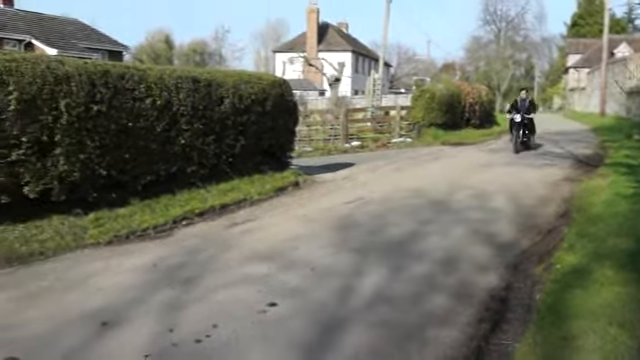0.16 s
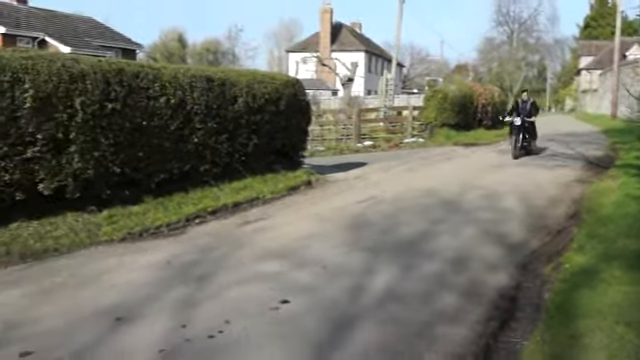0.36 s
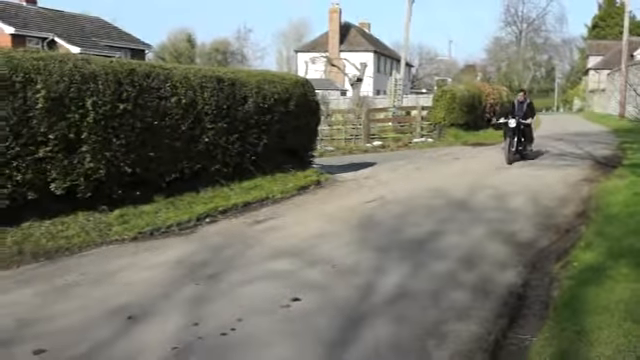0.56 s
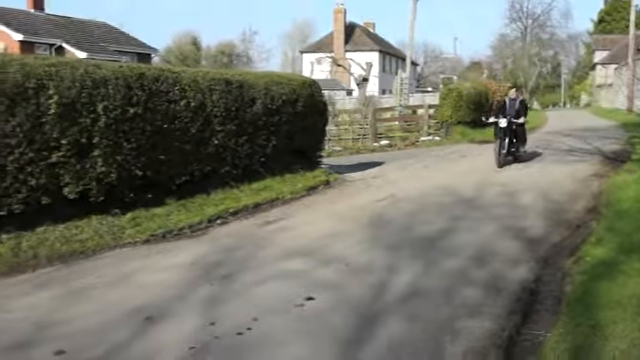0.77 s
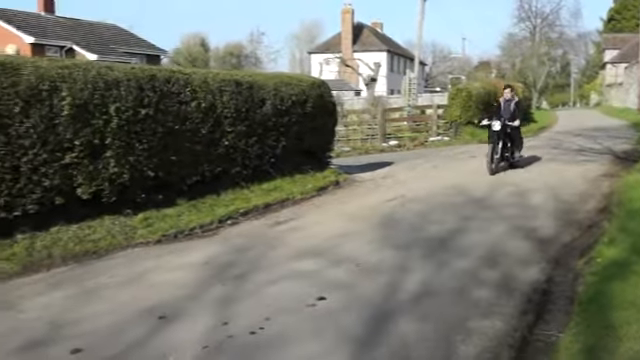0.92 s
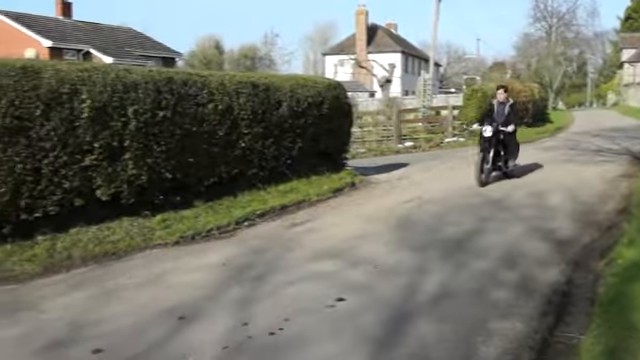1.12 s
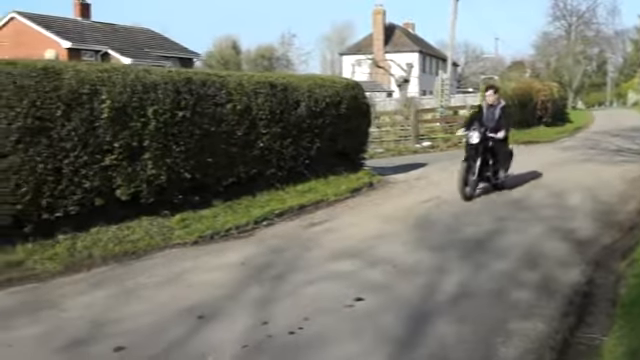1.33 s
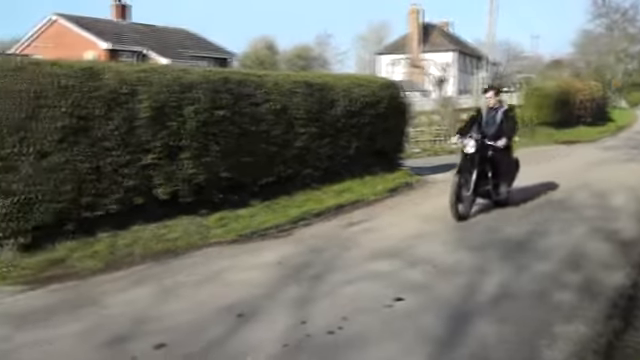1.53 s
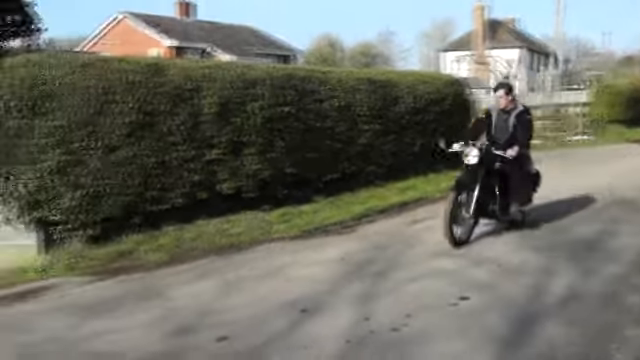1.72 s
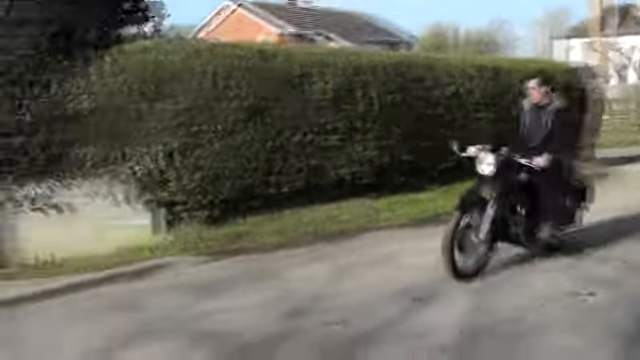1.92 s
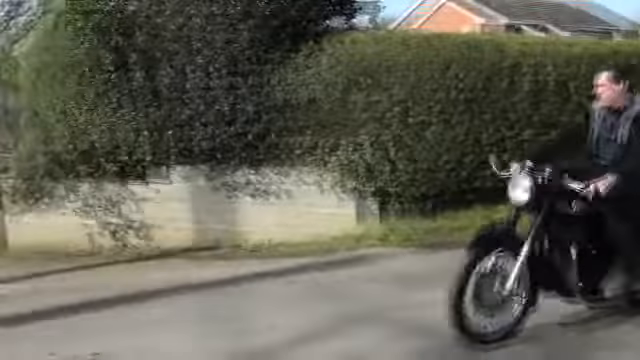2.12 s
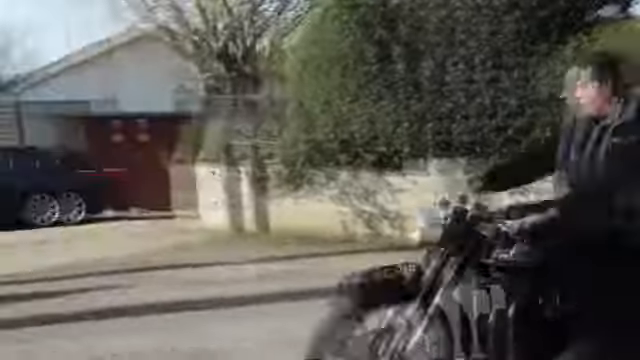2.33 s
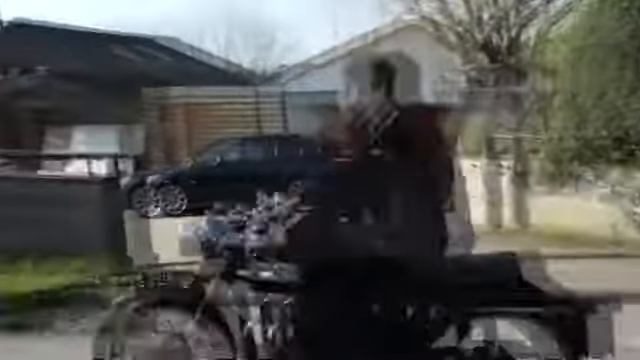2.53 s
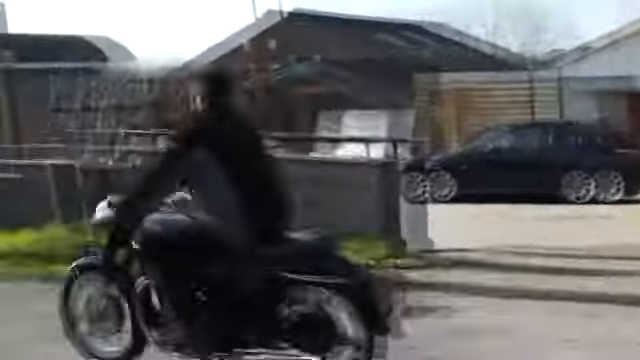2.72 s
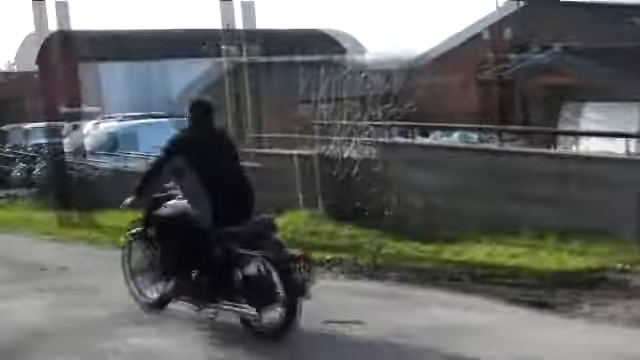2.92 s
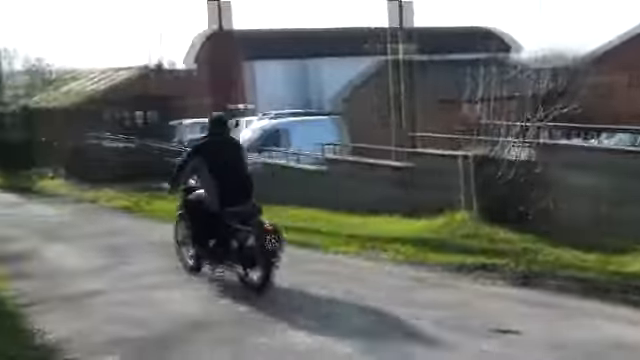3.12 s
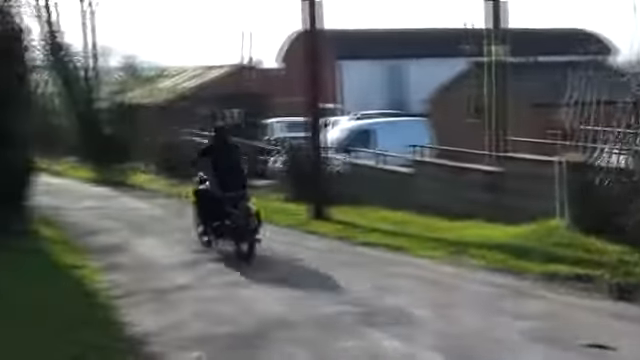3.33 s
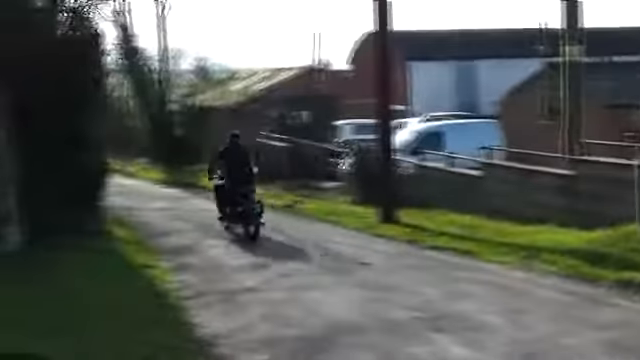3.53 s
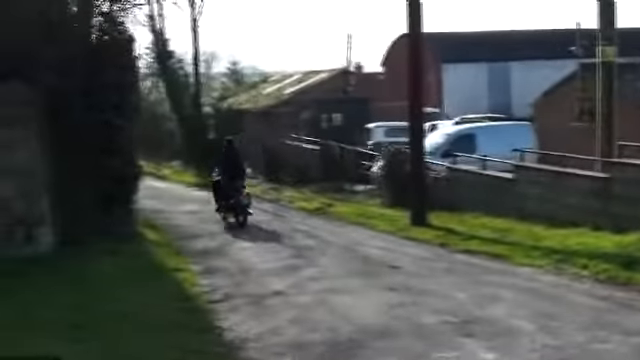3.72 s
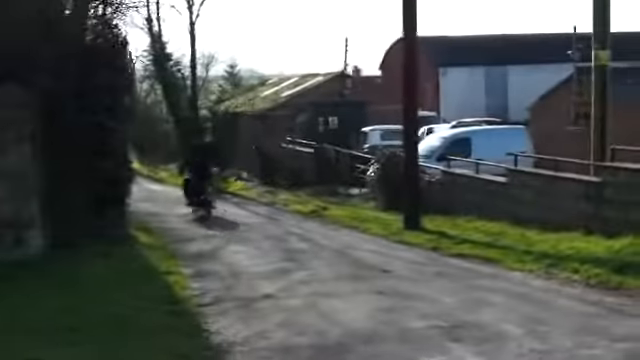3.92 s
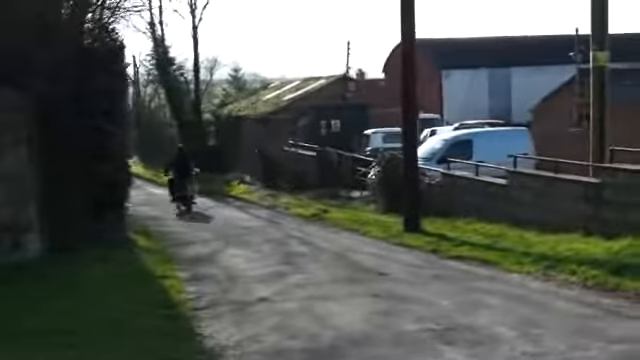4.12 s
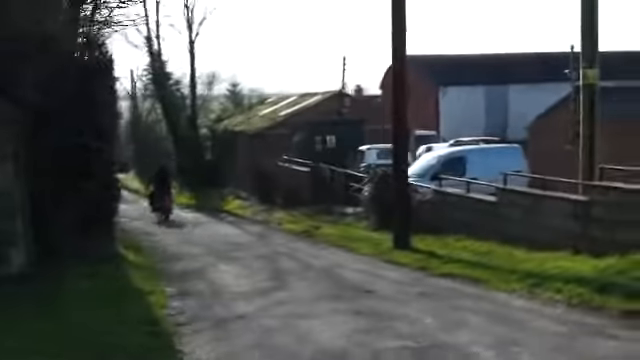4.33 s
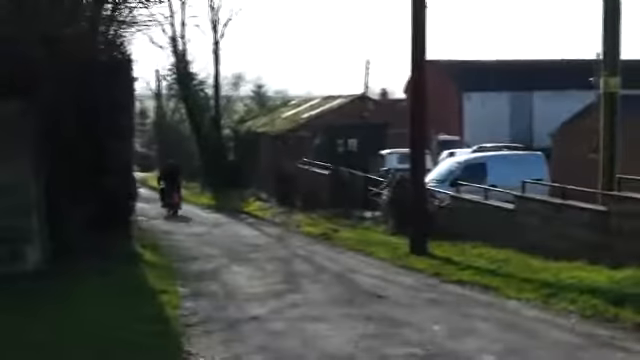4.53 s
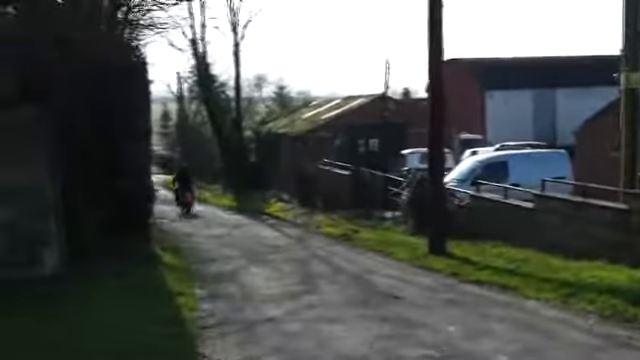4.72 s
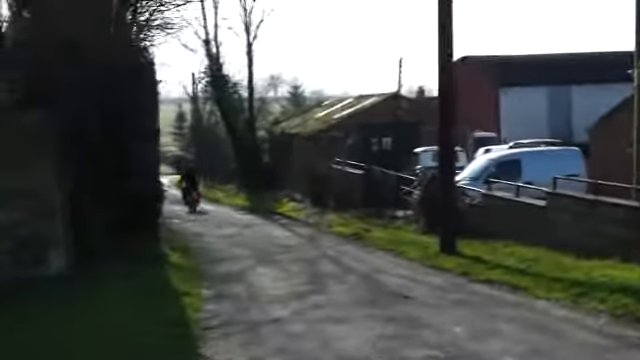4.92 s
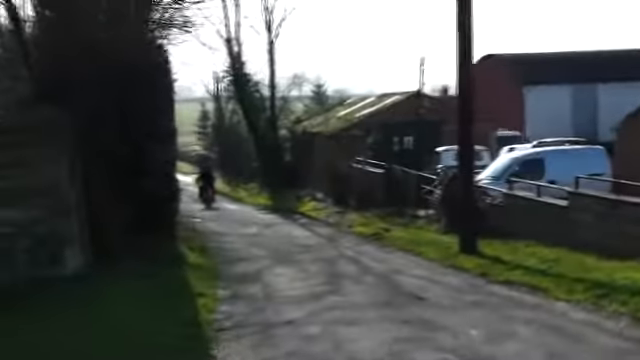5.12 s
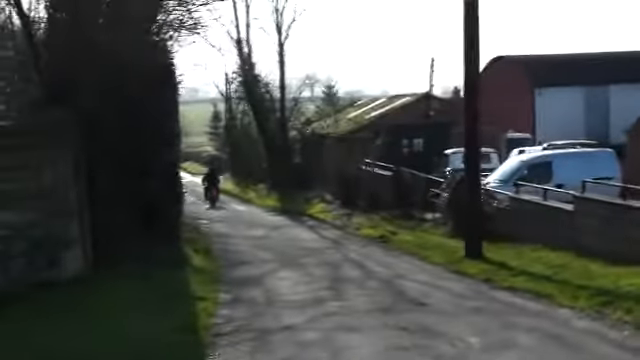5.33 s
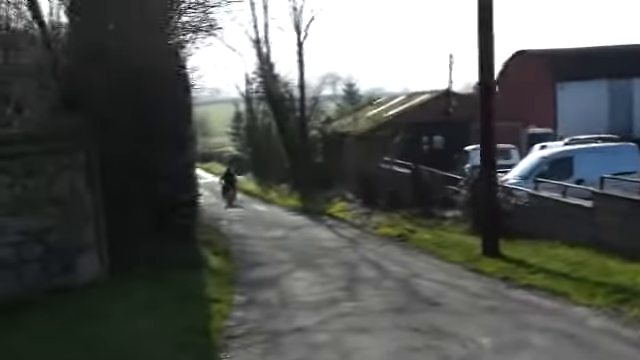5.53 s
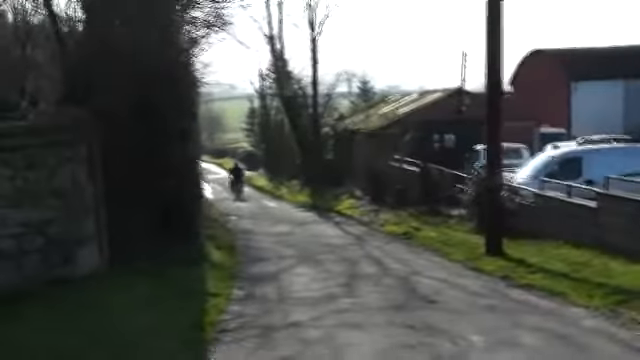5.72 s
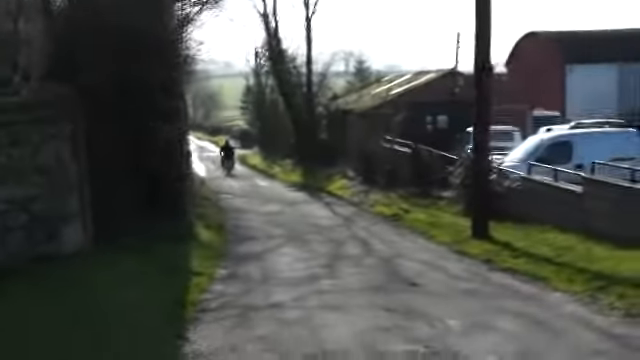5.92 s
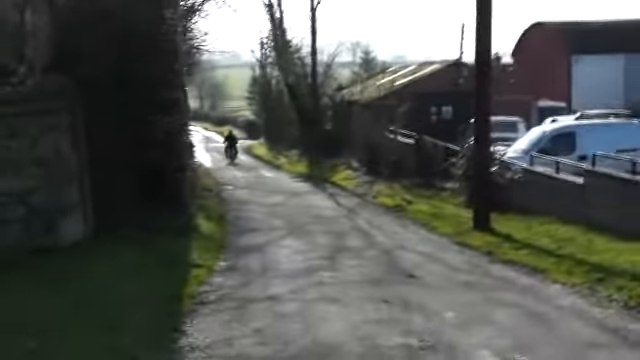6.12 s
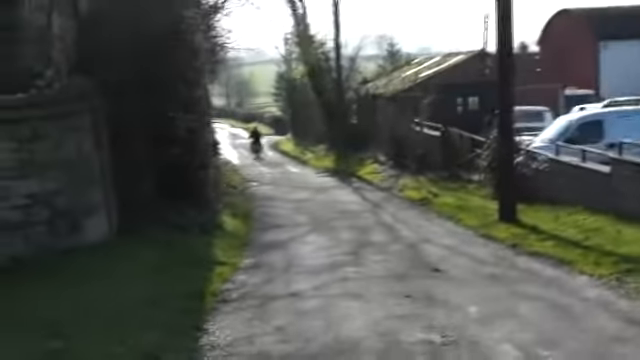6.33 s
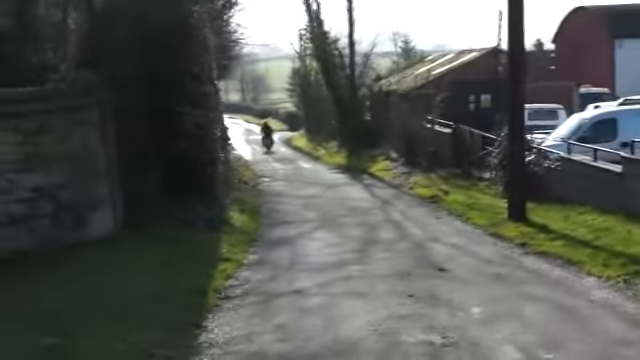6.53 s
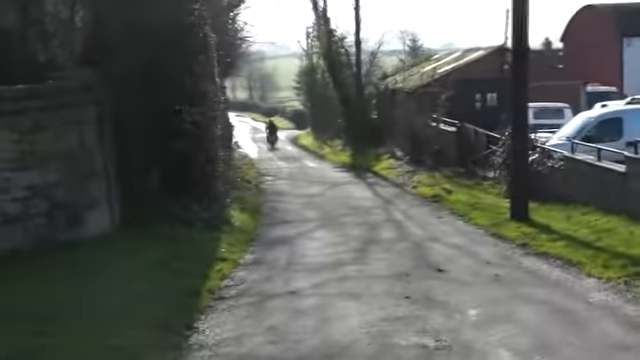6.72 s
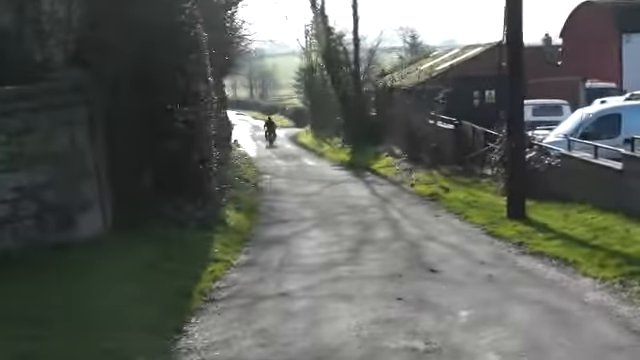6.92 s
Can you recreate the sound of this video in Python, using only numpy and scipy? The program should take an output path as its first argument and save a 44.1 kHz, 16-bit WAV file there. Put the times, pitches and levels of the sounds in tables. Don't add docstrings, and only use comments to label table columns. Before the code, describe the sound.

Wind rumbles on a hand-held microphone as a throaty old motorcycle accelerates past, pitch dropping, then dwindles to quiet with faint handling creaks.

```python
import sys
import numpy as np
from scipy import signal
from scipy.io import wavfile

SR = 44100
rng = np.random.default_rng(int(sys.argv[2]) if len(sys.argv) > 2 else 0)


def file_out(sig):
    cols = np.atleast_2d(sig).T
    lim = np.clip(cols, -1, 1)
    pcm = np.round(lim * 32767).astype(np.int16)
    wavfile.write(sys.argv[1], SR, pcm)


def how_loud(loudness_db):
    steps = np.asarray(loudness_db, float) / 20
    return 10 ** steps


N = 311346
T = np.arange(N) / SR
PASS_S = 2.5
NEAR_DB = -35
TAIL_ON_S = 3.83
FAR, PULL, SHUT, DRIVE, OVERRUN = range(5)

# time_s, cycles_per_s
REVS = [(0, 16.61), (0.9, 19.02), (1.4, 20.8), (1.9, 23.34), (2.25, 25.89), (2.47, 28.06), (2.54, 25.3),
        (2.75, 19.28), (2.92, 16.66), (3.02, 20.95), (3.2, 20.35), (3.45, 19.03), (3.6, 19.76),
        (3.9, 18.78), (4.6, 17.05), (5.9, 13.79), (6.15, 15.47), (7.1, 15.13)]
# time_s, effort_db, nearness_db
RIDE = [(0, -51, -58.5), (.5, -46, -49), (1.2, -31, -45.5), (1.6, -38.5, -39), (2.02, -25, -30),
        (2.36, -23.5, -29), (2.55, -24, -33.5), (2.88, -23.5, -36.5), (2.97, -20.5, -35.5),
        (3.2, -24.5, -38.5), (3.5, -18.5, -36.5), (3.585, -22.5, -39), (3.66, -40, -51), (3.81, -30, -47),
        (3.86, -28, -48.5), (4.3, -35, -57), (4.95, -53.5, -63.5), (6.4, -68, -72.5), (7.1, -45, -65)]


def rms_one(x):
    return x / np.sqrt(np.mean(x ** 2) + 1e-20)


def filtered(x, order, cut_hz, kind="low"):
    return signal.sosfilt(signal.butter(order, cut_hz, kind, fs=SR, output="sos"), x)


def in_time(rows, at=T):
    s, *columns = np.transpose(rows)
    return [np.interp(at, s, c) for c in columns]


def at_hz(points, hz):
    return np.interp(np.log(hz), np.log(np.array(points)[:, 0]), np.array(points)[:, 1])


def drift(rate):
    r = np.exp(-80 * np.pi * rate / SR)
    slow = signal.lfilter([1], [1, -2 * r, r * r], rng.standard_normal(N // 40 + 2002))[2000:]
    return np.interp(np.arange(N) / 40, np.arange(len(slow)), rms_one(slow))


def ring(clicks, modes):
    out = 0
    for hz, level_db, t60 in modes:
        r, w = how_loud(-60 / (t60 * SR)), 2 * np.pi * hz / SR
        out = out + signal.lfilter([0, how_loud(level_db) * np.sin(w)], [1, -2 * r * np.cos(w), r * r], clicks + 1e-18)
    return out


def swell(clicks, mode):
    return ring(ring(clicks, [mode]), [mode]) * 2 * np.e * np.log(1000) / (mode[2] * SR)


def burst(clicks, t60, low_hz, high_hz, rise=0):
    soft = np.exp(-1 / (rise * SR + 1e-9))
    decay = how_loud(-60 / (t60 * SR))
    envelope = signal.lfilter([1 - soft], np.convolve([1, -soft], [1, -decay]), np.abs(clicks) + 1e-18)
    return filtered(envelope * rng.standard_normal(N), 2, [low_hz, high_hz], "band")


def clicks_at(seconds, sizes):
    return np.bincount(np.clip(np.round(seconds * SR).astype(int), 0, N - 1), sizes, N)


def banded_noise(spectrum, likeness, patchy_db, rate):
    edges = np.geomspace(spectrum[0][0], spectrum[-1][0], 17)
    out, together, white = 0, drift(rate), rng.standard_normal((2, 2, N))
    for k, (low, high) in enumerate(zip(edges, edges[1:])):
        mid, side = filtered(white[k % 2], 2, [low, high], "band")
        hz = np.sqrt(low * high)
        alike = np.clip(at_hz(likeness, hz), -1, 1)
        gain = how_loud(at_hz(spectrum, hz) + patchy_db * (together + 1.12 * drift(rate)))
        out = out + gain * (np.sqrt(1 + alike) * mid + np.sqrt(1 - alike) * side * [[1], [-1]])
    return rms_one(out)


def lane_floor():
    # freq_hz, level_db_per_hz
    lane = [(40, -2), (70, 14.5), (110, 3.5), (240, 1.5), (330, -38), (430, -4.5), (500, -13), (570, 12),
            (680, -36), (1000, -0.5), (1450, -19), (2400, -23.5), (8400, -33.5), (13000, -52)]
    # freq_hz, level_db, t60_s
    hollow = [(591, 0.0, 0.12)]
    floor_db = -47.5
    floor = how_loud(floor_db) * banded_noise(lane, [(100, 0.76), (8000, 0.57)], patchy_db=-1.54, rate=6.6)
    return floor + how_loud(floor_db - 13.5) * rms_one(ring(floor, hollow))


def gusts():
    # start_s, hold_s, level_db
    gust_list = [(0, .03, -23.5), (0.042, 0.023, -17.5), (0.086, 0.036, -22), (0.141, .1, -18.5),
                 (0.298, 0.06, -17.5), (0.36, 0.091, -19), (0.455, 0.019, -18.5), (0.506, 0.014, -19),
                 (0.55, 0.036, -19), (0.621, 0.037, -18), (0.694, 0.069, -18), (0.771, .065, -19.5),
                 (0.847, 0.092, -23), (0.96, 0.22, -22), (1.125, 0.0095, -16.5), (1.232, 0.1, -21),
                 (1.375, 2.3, -19.5), (1.715, 0.34, -16.5), (2.76, 0.2, -15), (3.396, 0.069, -17.5),
                 (3.587, 0.56, -26.5), (4.083, .43, -30), (4.646, 0.19, -45.5), (4.962, .01, -35),
                 (5.017, 0.018, -32), (5.087, .06, -43), (5.264, 0.086, -31.0), (5.45, .1, -35.5),
                 (5.58, 0.17, -43), (5.747, .02, -34), (5.918, .015, -46.5), (6.053, 0.024, -45.5),
                 (6.262, 0.034, -47.5), (6.547, 0.048, -45), (6.697, .02, -41), (6.765, 0.063, -37),
                 (6.81, 0.11, -49), (7, .06, -50)]
    rise_db_per_s, fall_db_per_s, calm_db = 425, 302, -57
    t = T[::40]
    shapes = []
    for s, hold, level_db in gust_list:
        slopes = np.minimum(rise_db_per_s * (t - s), fall_db_per_s * (s + hold - t))
        shapes.append(level_db + np.minimum(0, slopes))
    return np.interp(T, t, np.maximum(calm_db, np.max(shapes, axis=0)))


def wind():
    # freq_hz, level_db_per_hz
    wind_spectrum = [(18, -43), (30, 0), (59, -4.5), (214, 5.5), (297, 1.5), (388, 5), (731, -13),
                     (1080, -22.5), (2040, -25.5), (3610, -66), (4000, -46), (5200, -86), (8800, -120)]
    # freq_hz, left_right_likeness
    wind_likeness = [(30, 0.23), (100, 0.97), (250, 0.48), (500, 0.0082), (1000, -0.5)]
    # time_s, common_part_db
    crosswind = [(0, 0), (1.35, 0), (1.6, -7), (3.55, -7), (3.75, -2), (4.5, 0), (7.1, 0)]
    # time_s, peak_db
    pops = [(0.29, -30), (0.366, -27), (0.4345, -17), (0.696, -24), (0.789, -23), (0.97, -31), (1.139, -29),
            (1.259, -28)]
    gust_db = gusts()
    lumps = how_loud(np.array([1.8 * drift(55), 1.8 * drift(46)]))
    ports = lumps * banded_noise(wind_spectrum, wind_likeness, patchy_db=.9, rate=36.0)
    strong = np.array([rms_one(port) for port in ports])
    weak = rms_one(filtered(strong, 3, 280))
    common = how_loud(in_time(crosswind)[0]) - 1
    strong = strong + common * strong.mean(axis=0)
    weak = weak + common * weak.mean(axis=0)
    force = np.clip((gust_db + 38) / 17, 0, 1)
    at, peak_db = np.transpose(pops)
    slaps = burst(clicks_at(at, how_loud(peak_db + 12)), 0.023, 300, 1400)
    return how_loud(gust_db + 2.5) * (force * strong + (1 - force) * weak) + slaps


def camera():
    # time_s, tick_db, thud_db
    creaks = [(5.972, -46, -51), (6.275, -54, -56), (6.536, -49, -54), (6.636, -46, -54),
              (6.684, -41, -31.5), (6.72, -41.5, -36), (6.755, -44, -35), (6.783, -38, -37.5),
              (6.8117, -47, -65), (6.847, -62, -41), (6.879, -51.5, -43)]
    at, tick_db, thud_db = np.transpose(creaks)
    ticks = burst(clicks_at(at, how_loud(tick_db - 2.0)), 0.033, 1500, 9300)
    rubs = burst(clicks_at(at, how_loud(thud_db)), 0.14, 360, 1950)
    body_modes = [(252, 8.5, 0.035), (500, -5, 0.03), (131, -25, 0.051)]
    return ticks + rubs - ring(clicks_at(at + 0.00183, how_loud(thud_db + 4.0)), body_modes)


def lane_sides(x):
    # left_s, left_db, right_s, right_db
    sides = [(.0031, -25, 0.0062, -57), (0.013, -37, 0.017, -13), (.019, -24, .023, -31)]

    def late(s):
        return np.r_[np.zeros(round(s * SR)), x][:N]

    return sum(np.array([how_loud(left_db) * late(left), -how_loud(right_db) * late(right)])
               for left, left_db, right, right_db in sides)


def road_echo(x):
    speed_m_s, closest_m, heights_m2 = 13.8, 1.94, 0.36
    distance = np.hypot(closest_m, speed_m_s * (T - PASS_S))
    lag = 2 * heights_m2 / distance / 343 * SR
    dull = filtered(x, 2, 2500)
    return (x + 0.25 * np.interp(np.arange(N) - lag, np.arange(N), dull)) / 1.273


def voice(part, at=T):
    parts = dict(second=(-6, 0, -8.5, 0, -5), back=(-14, -12.5, -13, -30, -2),
             bark=(-16, 2, -18.5, -11.5, -9), answer=(-2.5, -2.5, -6, 2.5, -3), echo=(-4, -8, -6, -14, -5),
             seating=(4, 2.5, .6, .6, 2.5), gasp=(.6, 4, 6, 3, 3), rasp=(-7, 3, -10, -8, -10),
             crack=(-39, -11, -13.5, -4.5, -6.5), hum=(15.5, 14, 11, 8.1, 8.1), growl=(8, 7, 11, 13.2, 9))
    # start_s, length_s, new_state
    throttle = [
        (1.3, 0.33, PULL),
        (2.456, 0.052, SHUT),
        (2.898, 0.065, DRIVE),
        (3.25, 0.26, OVERRUN),
        (3.59, 0.27, SHUT),
    ]
    levels, out, state = parts[part], parts[part][FAR], FAR
    for start, length, new in throttle:
        out = out + (levels[int(new)] - levels[state]) * np.clip((at - start) / length, 0, 1)
        state = int(new)
    return out


def leading_beat(crank):
    # start_s, slip_cycles, length_s
    handovers = [
        (2.485, .31, .025),
        (3.58, .23, .06),
        (3.72, .26, .08),
    ]
    slips = sum(slip * np.clip((T - s) / length, 0, 1) for s, slip, length in handovers)
    return np.maximum.accumulate(crank - slips)


def machine(crank):
    # freq_hz, level_db_per_hz
    clatter_spectrum = [(1060, -5), (1800, -0.5), (2670, -3.5), (3560, -2.5), (4420, -7), (4910, -6.5),
                        (9620, -15), (12000, -19.5), (14500, -37)]
    # freq_hz, left_right_likeness
    clatter_likeness = [(2000, .7), (5000, .62), (10000, .66)]
    # freq_hz, level_db_per_hz
    roar_spectrum = [(440, 12), (750, 8), (1000, 1), (1170, 4), (1390, -2), (1580, 2), (1960, 1),
                     (3000, -1), (3900, -90), (6600, -120)]
    # freq_hz, level_db, t60_s
    casing = [(2660, 3, 0.054), (3570, 2, 0.036)]
    clatter_db = in_time(RIDE)[1] + 0.24 * drift(0.52)
    roar_db = -29.5 + 0.88 * (clatter_db - NEAR_DB) + 2.0 * drift(10.2)
    roar_db = roar_db + 4 * np.exp(-((T - 2.91) / 0.05) ** 2)
    turn = leading_beat(crank)
    seating_db = voice("seating") * np.sin(2 * np.pi * (turn + 0.013)) ** 30
    gasp_db = voice("gasp") * np.cos(np.pi * (turn + 0.03)) ** 20
    hiss = banded_noise(clatter_spectrum, clatter_likeness, patchy_db=0.68, rate=49)
    clatter = rms_one(how_loud(seating_db + gasp_db) * hiss)
    roar = banded_noise(roar_spectrum, [(100, 1.0), (2000, 0.96)], patchy_db=0.0, rate=29.0)
    fins = rms_one(ring(clatter * np.cos(np.pi * (turn + 0.022)) ** 6, casing))
    fins_db = -6 - 7.9 * np.clip(T - 1.1, 0, 1)
    return how_loud(clatter_db + 3.0) * (clatter + how_loud(fins_db) * fins) + how_loud(roar_db) * roar


def silencer_drone(crank):
    # middle_s, half_length_s, level_db
    booms = [
        (1.197, 0.37, -29.5),
        (1.99, 0.34, -20),
        (2.697, 0.23, -18),
        (3.297, 0.27, -28),
        (4.16, 0.22, -34),
        (4.83, 0.22, -39),
        (5.698, 0.32, -54.5),
        (6.867, 0.16, -40.5),
    ]
    swells = sum(how_loud(level_db) * np.maximum(0, 1 - ((T - s) / (1.45 * half)) ** 2) for s, half, level_db in booms)
    return swells * how_loud(0.88 * drift(13.0)) * np.sin(8 * np.pi * crank + 6.35)


def engine_orders(turn):
    # multiple_of_cycle, level_db
    growl_orders = [(8, -2), (10, 0), (12, -2), (14, -5)]
    hum_hz, hum_width_hz = 125, 19
    bass_db = NEAR_DB + 0.89 * (in_time(RIDE)[1] - NEAR_DB)
    tuned = 1 / (1 + ((6 * in_time(REVS)[0] - hum_hz) / hum_width_hz) ** 2)
    hum = how_loud(bass_db + voice("hum") + 0.39 * drift(2.9)) * tuned * np.cos(12 * np.pi * turn)
    growl = sum(how_loud(level_db + 1.3 * drift(6)) * np.cos(2 * np.pi * k * turn) for k, level_db in growl_orders)
    return -hum - how_loud(bass_db + voice("growl")) * growl


def pressure_crack(at, kind, front_db, tail_on_db, uneven):
    # low_hz, high_hz, level_db
    crack_bands = [(1300, 2070, 10), (2200, 3100, 2), (3300, 4500, 6), (4700, 6000, 1), (6300, 7900, -3),
                   (8200, 10000, -7), (10300, 13500, -9)]
    front_db = front_db - 4.5 * (kind > 0)
    front = clicks_at(at + 0.000943, how_loud(front_db + tail_on_db))
    shock = filtered(filtered(front, 1, [700, 2600], "band"), 2, 3500)
    tearing = 0
    for (low_hz, high_hz, level_db), own in zip(crack_bands, uneven.T):
        top_loss_db = 2 * (at > TAIL_ON_S) * np.log2(low_hz / 1500)
        tears = clicks_at(at - .0013, how_loud(front_db + 4.5 * own - top_loss_db))
        tearing = tearing + how_loud(level_db - 11.0) * burst(tears, 0.015, low_hz, high_hz, .0006)
    return tearing - how_loud(16.0) * shock


def baffle_rasp(at, near, facing, chance):
    # freq_hz, level_db, t60_s
    baffle = [(1290, 0, 0.017), (1390, 0, 0.018), (1490, 0, 0.017)]
    whistle = near * facing * how_loud(-16.5 + 1.2 * chance[:, 3])
    choice = chance[:, 4:7].argmax(axis=1)
    rasp = sum(swell(clicks_at(at - 0.0012, whistle * (choice == k)), mode) for k, mode in enumerate(baffle))
    hiss = clicks_at(at - 0.0004, near * how_loud(11 * ~facing))
    return rasp + how_loud(-22) * burst(hiss, 0.12, 1040, 1570, 0.00018)


def gliding_bark(at, sizes):
    # freq_hz, level_db, t60_s
    bark_modes = [(650, 4, 0.05), (560, 2, 0.05), (610, 1, 0.02)]
    # time_s, pitch_factor
    glide = [(0, .99), (1.7, 1.0), (2.1, 1.015), (2.3, 1.05), (2.42, 1.07), (2.52, 1.0), (7.1, .98)]
    factors = np.linspace(.97, 1.09, 7)
    nearest = np.abs(in_time(glide, at)[0][:, None] - factors).argmin(axis=1)
    rung = 0
    for k, factor in enumerate(factors):
        modes = [(hz * factor, level_db, t60) for hz, level_db, t60 in bark_modes]
        rung = rung + ring(clicks_at(at, sizes * (nearest == k)), modes)
    return filtered(rung, 4, 790)


def pipe_ring(at, size_db, facing):
    # freq_hz, level_db, t60_s
    pipe = [(263, 6.5, 0.017), (130.2, -8.5, 0.17), (318, -46, 0.0099)]
    clicks = clicks_at(at - .0005 * facing, np.where(facing, 1, -1) * how_loud(size_db + 10))
    puffs = np.convolve(clicks, np.hanning(40) / 20)[:N]
    front = filtered(puffs * (T < PASS_S), 2, 233, "high")
    rear = filtered(puffs * (T >= PASS_S), 2, 88, "high")
    return ring(front + rear, pipe)


def exhaust(crank):
    turn = leading_beat(crank)
    quarter = np.arange(0, 4 * int(turn[-1]))
    kind = quarter % 4
    chance = rng.standard_normal((len(quarter), 14))
    at = np.interp(quarter / 4, turn, T) - .002 + .00012 * chance[:, 0]
    at = at - .0004 * (kind == 2) * np.where(at < PASS_S, 1, -1.5)
    facing = at < PASS_S
    effort_db = in_time(RIDE, at)[0]
    second_db, return_db, echo_db = voice("second", at), voice("back", at), voice("echo", at)
    size_db = effort_db + np.choose(kind, [0 * at, return_db, second_db, return_db + second_db / 2])
    size_db = size_db + .9 * chance[:, 1]
    shove = how_loud(size_db + 12) * (at < 3.3) * (kind == 2)
    push = np.convolve(clicks_at(at + np.where(facing, .00015, -.0003), shove), np.hanning(32))[:N]
    bark_db = effort_db + np.choose(kind, [0 * at, echo_db, voice("answer", at), echo_db])
    bark_db = bark_db + voice("bark", at) + 6.0 + .8 * chance[:, 2]
    bark = push + gliding_bark(at - .0012, how_loud(bark_db))
    tail_on_db = 5 * (at > TAIL_ON_S) * (kind == 0)
    near = how_loud(size_db + voice("rasp", at) + tail_on_db + 23.5 - 18.0 * (kind > 0))
    rasp = baffle_rasp(at, near, facing, chance)
    front_db = size_db + voice("crack", at) + 20.0 + chance[:, 3]
    crack = pressure_crack(at, kind, front_db, tail_on_db, chance[:, 7:])
    tones = silencer_drone(crank) + engine_orders(turn)
    return pipe_ring(at, size_db, facing) + bark + rasp + crack + tones


def scene():
    # time_s, left_right_db
    pan_curve = [(0, -.5), (1.2, -.5), (2.28, -5), (2.62, -4), (2.8, -.5), (3.2, .5), (3.5, 3.5),
                 (4.1, 1.5), (7.1, 1.5)]
    crank = -.825 + np.cumsum(in_time(REVS)[0]) / SR
    pan = how_loud(in_time(pan_curve)[0] * [[.5], [-.5]])
    pipes = road_echo(exhaust(crank))
    lows = signal.lfilter([.07], [1, -.93], pipes)
    highs = pipes - lows
    engine = lows + pan * highs + pan ** 1.05 * machine(crank) + lane_sides(highs)
    return engine + wind() + camera() + lane_floor()


def roll_off(x):
    return signal.sosfilt(signal.butter(12, 15360, fs=SR, output="sos"), x)


def record(dry):
    dry = filtered(dry, 2, 60, "high")
    overloaded = 0.84 * np.tanh(dry / 1.012)
    mix = signal.sosfilt(signal.cheby2(8, 27, 14700, fs=SR, output="sos"), overloaded)
    return roll_off(mix)


dry = scene()
out = record(dry)
file_out(out)
```